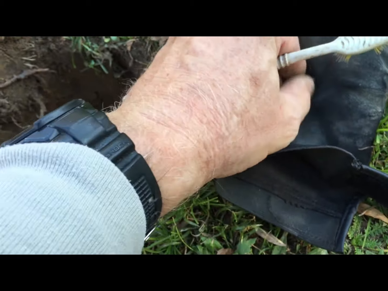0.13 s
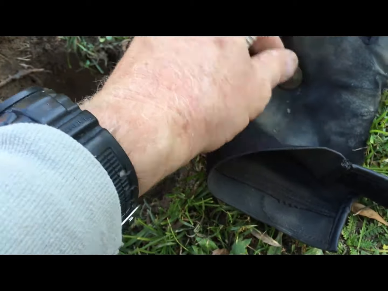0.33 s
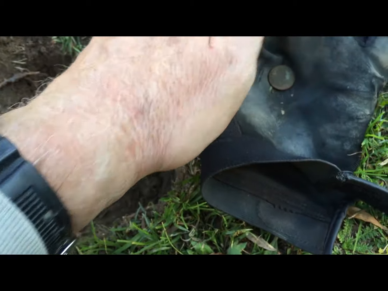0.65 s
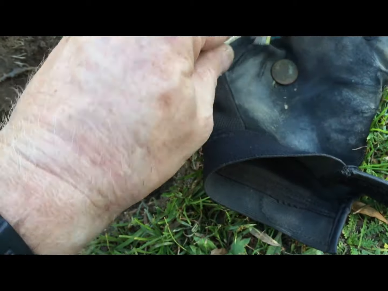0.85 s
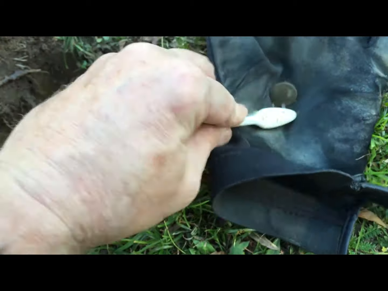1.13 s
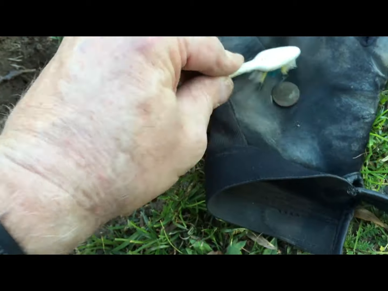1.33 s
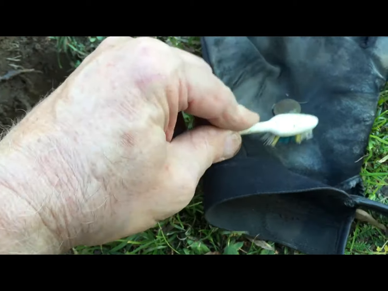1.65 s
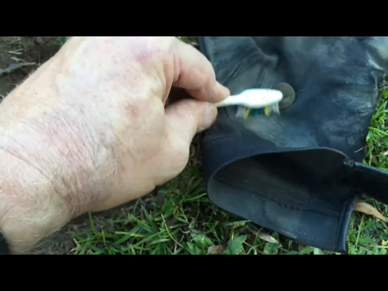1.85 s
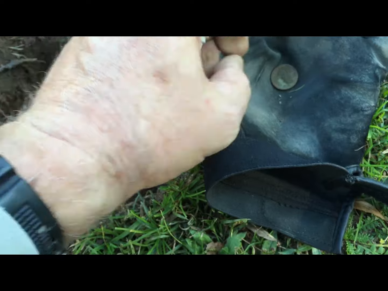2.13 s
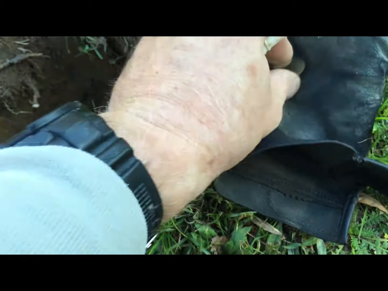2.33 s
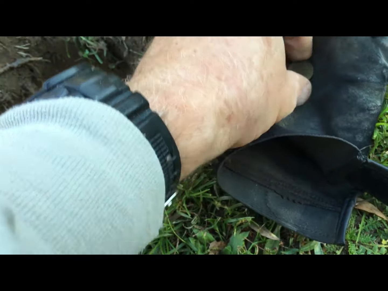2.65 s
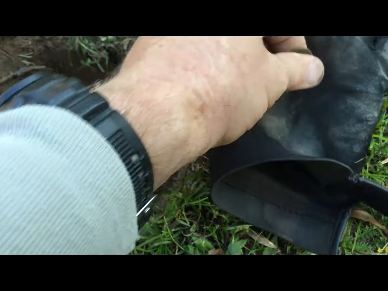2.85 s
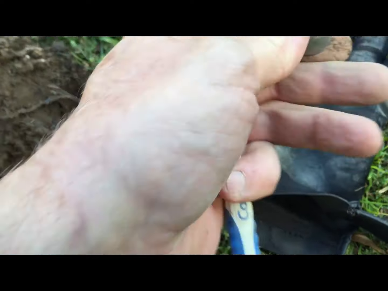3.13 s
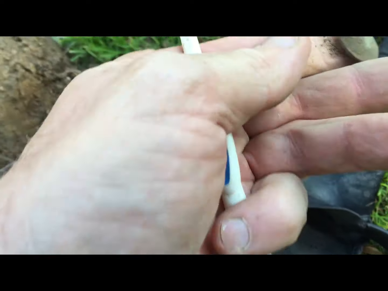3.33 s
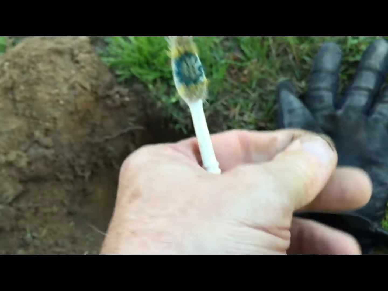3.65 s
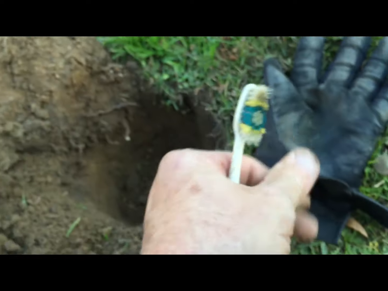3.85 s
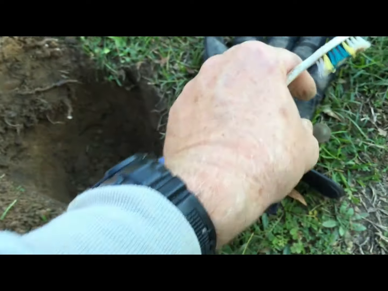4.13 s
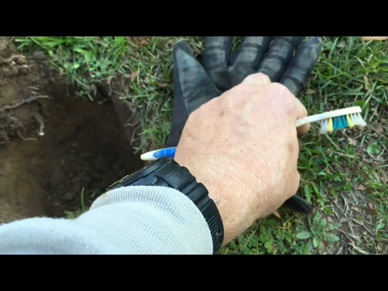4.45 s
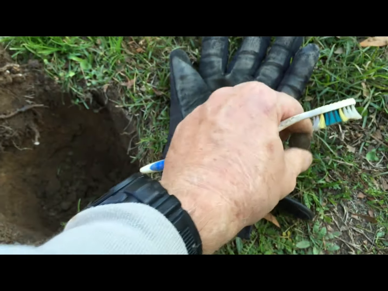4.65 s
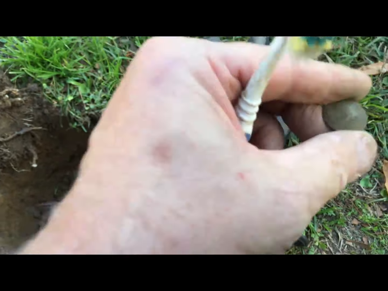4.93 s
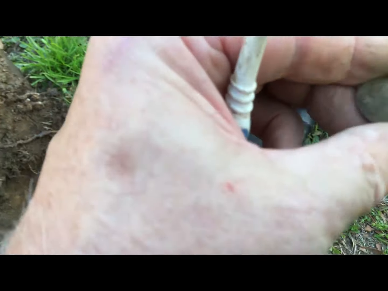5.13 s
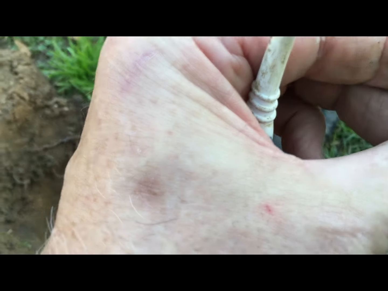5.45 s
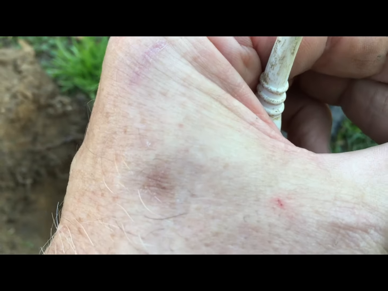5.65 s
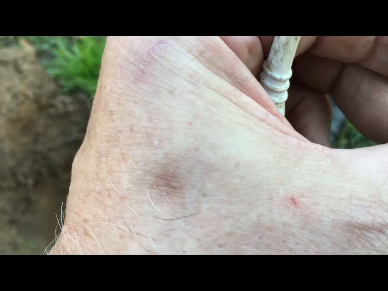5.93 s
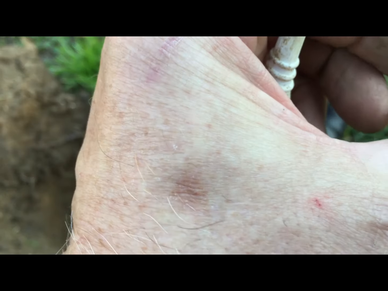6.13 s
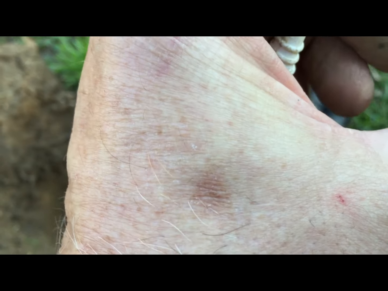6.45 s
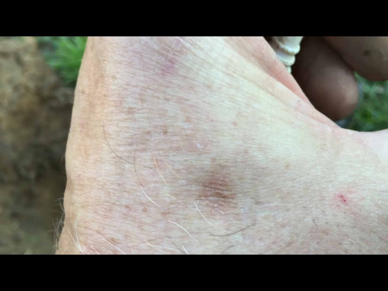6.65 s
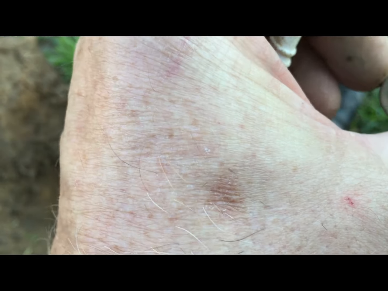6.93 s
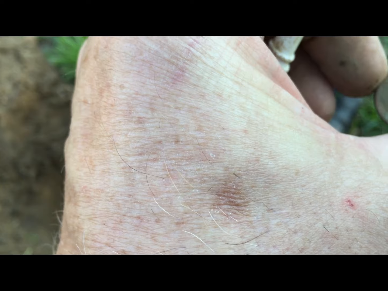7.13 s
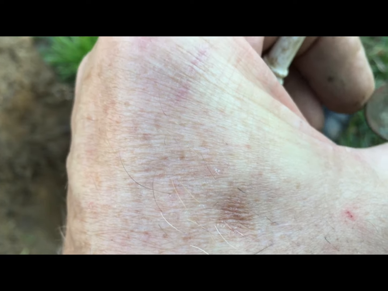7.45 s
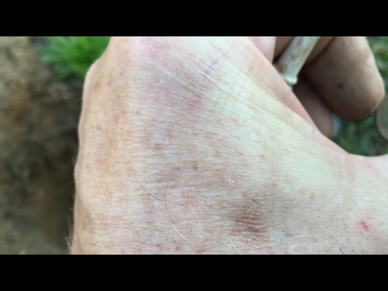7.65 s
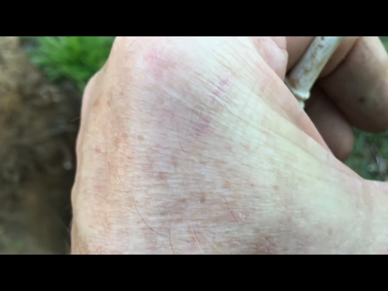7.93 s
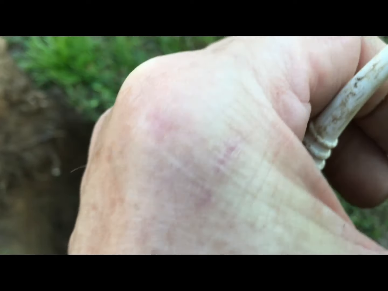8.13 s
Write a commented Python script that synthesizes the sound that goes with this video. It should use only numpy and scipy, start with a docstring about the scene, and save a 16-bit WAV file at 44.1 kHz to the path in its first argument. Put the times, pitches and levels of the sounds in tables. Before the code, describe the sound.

A distant engine rises and drops in pitch as it shifts gears, over a steady low road rumble. Close up, a coin bumps softly on leather and toothbrush bristles scratch dirt off it with tiny crackles. Fingers pick the coin up with a click, and cloth swishes past the microphone. In the second half the handling stops, leaving the fading engine, a soft traffic wash and faint birds in the open air.

```python
"""Scrubbing a dug-up coin outdoors

A coin is laid on a leather glove in the grass, scrubbed with a toothbrush and picked up again.
Bristles and fingers stick and slip, grit snaps loose, the coin bumps and a sleeve swishes close by.
Far off, a V8 engine speeds up through two gear changes, its pitch set by how fast it fires.
It fades into the wash of traffic while a few birds chirp."""
import sys
import numpy as np
from scipy import signal
from scipy.fft import rfft, irfft, next_fast_len
from scipy.io import wavfile
from scipy.ndimage import uniform_filter1d, map_coordinates

SR = 44100
rng = np.random.default_rng(int(sys.argv[2]) if len(sys.argv) > 2 else 0)


def unload_wav(signal):
    """Save mono or channel-first audio to the path in sys.argv[1] as 16-bit WAV at rate SR, clipped to [-1, 1]."""
    wavfile.write(
        sys.argv[1],
        SR,
        np.round(np.clip(np.atleast_2d(signal).T, -1, 1) * 32767).astype(np.int16),
    )


N = 365789
TIME = np.arange(N) / SR
CUTOFF_HZ, THUD_BELOW_HZ = 12000, 1000
EDGE_DB, SWELL_ROUNDNESS = 28.5, 1.55  # a rise or fall time below covers a change of EDGE_DB

# Strokes of the brush, and of fingers sliding the coin over leather. Each row: time of top speed,
# rise and fall in seconds, relative level in dB, extra treble in dB.
BRUSH_STROKES = [(1.21, 0.041, 0.03, -50, -1), (1.255, 0.036, 0.023, -56.5, 5),
                 (1.335, 0.13, 0.077, -49, 5), (1.4, 0.069, 0.068, -54, 4), (1.64, 0.077, 0.059, -49.5, 2),
                 (1.69, 0.048, 0.065, -74.5, 15), (1.75, 0.063, 0.048, -49.5, -3.5),
                 (1.797, 0.015, 0.042, -56.5, -12), (1.897, 0.045, 0.026, -56.5, -13),
                 (1.948, 0.088, 0.066, -53, 4), (2.065, 0.096, 0.12, -50, 5.5)]
FINGER_STROKES = [(0.13, 0.39, 0.49, -69.5, -2), (0.3, 0.034, 0.066, -67.5, -2),
                  (0.368, 0.031, 0.025, -56.5, -6.5), (0.485, 0.054, 0.061, -62, -2),
                  (0.563, 0.11, 0.11, -57.5, -7), (0.65, 0.15, 0.24, -67.5, -8),
                  (2.58, 0.14, 0.2, -56, -4.5), (2.655, 0.056, 0.076, -51.5, -8.5),
                  (2.77, 0.075, 0.1, -80, 4), (2.862, 0.065, 0.06, -51.5, -3.5),
                  (2.905, 0.064, 0.038, -54, -7), (3.0, 0.097, 0.1, -62, 0.5)]
# Sleeve and skin brushing past. Each row: time of top speed, rise and fall in seconds,
# relative level in dB, ringing pitch in Hz, its slide in octaves per second.
SLEEVE_STROKES = [(0.94, 0.08, 0.12, -64.5, 6100, 3), (1.04, 0.15, 0.14, -74.5, 7150, -2),
                  (3.177, 0.13, 0.17, -66, 7800, -5), (3.291, 0.02, 0.039, -53, 6530, 3),
                  (3.331, 0.045, 0.095, -58, 7400, 3), (3.821, 0.033, 0.06, -67, 8550, 0),
                  (3.872, 0.05, 0.08, -51.5, 8770, 7.5), (3.942, 0.062, 0.093, -57.5, 7740, -10),
                  (4.075, 0.025, 0.026, -50, 6900, -2)]
# The tone colour of those three. Each row: frequency in Hz, relative strength in dB.
BRUSH_SPECTRUM = [(400, 1), (700, -7.5), (1100, 2), (2000, 3), (2350, -2.5), (2750, -4.5), (3300, -1),
                  (4800, -5), (6200, -3), (7700, -7.5), (9200, -6.5), (10500, -12.5), (11400, -8.5),
                  (12500, -24)]
FINGER_SPECTRUM = [(400, -26), (780, -3.5), (1200, 3), (2050, 2.5), (2400, -2), (2900, -0.5), (3600, -0.5),
                   (4500, -4), (6000, -2), (7800, -7.5), (8800, -4), (10500, -12.5), (11300, -5),
                   (12500, -24)]
SLEEVE_SPECTRUM = [(1200, -40), (2000, -28), (2350, -0.5), (2900, -6), (4200, -3.5), (5100, -4.5),
                   (6400, 2), (9000, 3), (10500, -2), (11400, 1.5), (12500, -18)]
# Skin rasping on handle and coin. Each row: middle and half length in seconds, pitch and
# band width in Hz, level in dB.
GRIP_RASPS = [(0.128, 0.044, 1770, 730, -66), (0.747, 0.036, 7660, 2500, -75.5),
              (2.32, 0.048, 8350, 4900, -74.5), (2.657, 0.011, 3500, 2389, -55.5),
              (2.884, 0.12, 2030, 350, -69), (3.911, 0.033, 2360, 400, -67), (4.364, 0.15, 2120, 1500, -72),
              (4.823, 0.029, 8300, 4900, -79)]
# Soft bumps of the coin on the glove, and sharp clicks of coin and handle in the hand.
# Each row: start in seconds, relative peak in dB, brightness in dB per octave, extra thud in dB.
COIN_BUMPS = [(0.3585, -48.5, 4, 10), (0.369, -47, -10, -16), (0.5906, -39.5, 2.5, 4.5),
              (1.578, -42, -7, -4)]
HAND_CLICKS = [(2.975, -30, 1, -1), (3.2249, -35.5, -3, -13), (4.337, -45, -4, 2), (5.05, -47.5, 10, 26)]
# The coin's notes, muffled by leather. Each row: pitch in Hz, relative level in dB,
# seconds to fade by 60 dB.
COIN_NOTES = [(445, -15.5, 0.03), (720, -11.5, 0.012), (950, -6, 0.016), (1380, -7.5, 0.017),
              (1950, -7, 0.0098), (2460, -8, 0.018), (3270, -4, 0.0058)]
# The notes in a click. Each row: pitch and band width in Hz, relative level in dB.
CLICK_NOTES = [(670, 250, 0.5), (1350, 280, 1), (1970, 590, 0), (3750, 470, -5), (6300, 1200, -28)]
# Dirt snapping loose. Each row: start in seconds, peak in dB, pitch in Hz, seconds to crumble away.
GRIT_SNAPS = [(0.367, -45, 7000, .008), (0.7808, -47.5, 10000, .004), (0.928, -44, 4400, 0.0088),
              (0.932, -37.5, 5600, .004), (1.1906, -43, 5000, .005), (1.198, -40, 3600, 0.0075),
              (1.213, -40, 5530, 0.012), (1.2692, -38, 5000, .005), (1.274, -39, 5000, .005),
              (1.284, -30.5, 5170, 0.0035), (1.294, -32, 4440, .006), (1.3175, -31, 6750, .005),
              (1.32, -33.5, 1930, 0.012), (1.3305, -33, 5500, .006), (1.339, -31.5, 5360, .02),
              (1.3464, -33, 4900, .008), (1.355, -32, 4870, .008), (1.579, -46, 6300, .008),
              (1.5972, -40, 4170, 0.015), (1.6098, -34, 5530, 0.012), (1.622, -42, 5000, .012),
              (1.734, -44, 2300, .008), (1.785, -54, 3500, .005), (1.822, -48, 3800, 0.029),
              (2.112, -37.5, 4000, 0.011), (2.607, -41, 5990, 0.0076), (2.6538, -41, 3770, .006),
              (2.699, -41, 1980, 0.0082), (2.8375, -50, 4260, .006), (2.965, -46, 3600, .006),
              (3.181, -44, 8500, .008), (3.286, -41.5, 5460, .02), (3.879, -38, 4500, .004),
              (3.881, -39, 3160, 0.0035), (4.0746, -44, 8005, 0.0094), (4.337, -58, 10500, .008),
              (6.63, -58.5, 10500, .012)]

# The engine pulls through three gears, then coasts. Each row: time in seconds, firings per second.
FIRING_RATE = [(0.0, 112.6), (0.6, 128.1), (0.95, 145.6), (1.52, 158.5), (1.82, 126.4), (2.5, 129.8),
               (3.13, 143.8), (3.62, 99.34), (5.4, 123), (6.66, 129.3), (7.1, 103), (8.29, 88.9)]
# How loud it arrives. Each row: time in seconds, relative levels of firing tone and burble in dB.
ENGINE_LEVELS = [(0.0, -37.5, -47), (0.6, -41, -39.5), (0.95, -34.5, -39), (1.35, -39, -44),
                 (1.68, -37, -43.5), (2.1, -37, -40.5), (3.25, -38, -40.5), (3.9, -41, -42.5),
                 (4.95, -41, -44), (6.45, -44, -43.5), (6.7, -60, -41), (7.2, -50, -53), (8.29, -74, -70)]
# The driver eases off. Each row: deepest moment, rise and fall in seconds, depth of the dip in dB.
THROTTLE_LIFTS = [(1.56, 0.11, 0.066, 8.5), (4.56, 0.081, 0.19, 5.5), (5.95, 0.8, 0.21, 7.5)]
# Engine echoes off far walls. Each row: delay in seconds, steady level in dB, time the car passes
# the wall and half length of that pass in seconds, level of the echo added then in dB.
WALL_ECHOES = [(.23, -16.5, 1.71, 0.045, 5.5), (.41, -16, 1.976, 0.058, 1.5), (.62, -14, 2.07, .05, 1)]
# The low roar of the exhaust. Each row: frequency in Hz, relative strength in dB.
ROAR_SPECTRUM = [(170, 5), (220, 6), (270, -4), (340, -4.5), (385, -23.5), (430, -14.5), (500, -13.5),
                 (550, -11), (620, -18.5), (800, -32.5)]
# A second, steadier motor. Each row: time in seconds, pitch in Hz.
MOTOR_PITCH = [(0.0, 63.8), (1.8, 67.07), (3.1, 68.47), (3.6, 61.15), (4.4, 60.1)]
# Its swells. Each row: loudest moment, rise and fall in seconds, level in dB.
MOTOR_SWELLS = [(0.08, 0.24, 0.28, -41.5), (0.42, 0.34, 0.27, -38), (1.38, 0.3, 0.45, -33.5),
                (1.98, 0.34, 0.71, -39.5), (2.82, 0.41, 0.76, -36.5)]
# A faint, late hum. Each row: pitch in Hz, relative level in dB.
HUM_TONES = [(165.5, -53.5), (184, -61.5), (198.5, -56)]
# Thin far calls, mostly birds, and tyres singing briefly. Each row: middle and half length
# in seconds, pitch in Hz, relative level in dB.
BIRD_CALLS = [(4.337, 0.14, 1250, -70), (4.599, 0.1, 4500, -85.5), (4.656, 0.12, 5400, -86),
              (4.832, .022, 5930, -80), (5.63, 0.013, 2300, -71), (6.399, 0.023, 2800, -83),
              (6.396, 0.049, 2430, -77), (6.51, .028, 2330, -74.5), (6.639, .025, 1950, -73)]
TYRE_SONGS = [(4.803, 0.17, 1450, -74.5), (8.152, 0.085, 1650, -71.5)]
# Road rumble, deep boom, tyre wash and still air. Each row: frequency in Hz, relative strength in dB.
RUMBLE_SPECTRUM = [(60, 5), (110, -4), (160, -6.5), (185, -0.5), (220, 0), (265, -5), (320, -18),
                   (390, -19), (470, -27), (560, -29), (630, -44.5), (1000, -68)]
BOOM_SPECTRUM = [(22, -24), (32, -17), (40, -12), (48, -0.5), (62, -16.5), (85, -5.5), (130, 2.5),
                 (180, -14.5)]
TYRE_SPECTRUM = [(400, -8.5), (700, -2.5), (1050, 1.5), (1500, 2), (1900, 0), (2400, -6), (3300, -14),
                 (5000, -26), (9000, -57)]
AIR_SPECTRUM = [(500, -10), (3800, 4), (4900, -0.5), (5800, 2), (7600, -2.5), (9200, -0.5), (10500, -6),
                (11400, -3), (12500, -11.5)]


def friction(strokes, spectrum, per_s, spread_db, flutter_db, patchy_db, body_db, treble_db, brightening):
    """Countless tiny slips, bunched by the uneven surface. Brightening above 1 makes speed add treble."""
    slips = grains(per_s, spread_db) * from_db(flutter_db * drift(72))
    slips = patchy(coloured(slips, spectrum), patchy_db)
    body = signal.sosfiltfilt(signal.butter(2, 4500, fs=SR, output="sos"), slips)
    treble = slips - body
    body_gain = treble_gain = 0
    for s, rise_s, fall_s, db, bright_db in strokes:
        speed = swell(s, rise_s, fall_s)
        body_gain += from_db(db + body_db) * speed
        treble_gain += from_db(db + treble_db + bright_db) * speed ** brightening
    return body_gain * rms_one(body) + treble_gain * rms_one(treble)


def sleeve_swishes(hiss_db=-1.5, ring_db=-5.5, ring_width_hz=900):
    """Cloth hisses finely, with a ringing band that slides as the hand moves."""
    hiss = from_db(hiss_db) * coloured(grains(per_s=7200, spread_db=3.0), SLEEVE_SPECTRUM)
    lowpass = signal.butter(2, ring_width_hz / 2, fs=SR, output="sos")
    low_noise = np.sqrt(2) * rms_one(signal.sosfilt(lowpass, rng.standard_normal(N)))
    out = 0
    for s, rise_s, fall_s, db, hz, glide in SLEEVE_STROKES:
        sliding_hz = hz * 2 ** (glide * np.clip(TIME - s, -.1, .1))
        ring = from_db(ring_db) * low_noise * sine(sliding_hz)  # moves the noise up to that pitch
        out += from_db(db) * swell(s, rise_s, fall_s) * (hiss + ring)
    return out


def grip_rasps():
    """Skin slips on the handle and coin in short, soft rasps."""
    slips = grains(per_s=4000, spread_db=4.5)
    return sum(from_db(db) * bell(s, half_s) * band(slips, hz, width_hz)
               for s, half_s, hz, width_hz, db in GRIP_RASPS)


def coin_bumps(level_db=2.5, contact_s=0.00019):
    """A soft blow rings all the coin's notes, and the leather quickly stops them."""
    out, t = np.zeros(N), TIME[:SR // 15]
    for s, peak_db, slope_db, thud_db in COIN_BUMPS:
        ring = 0
        for hz, db, fade_s in COIN_NOTES:
            note_db = db + slope_db * np.log2(hz) + thud_db * (hz < THUD_BELOW_HZ) + rng.normal(0, 1)
            note = from_db(note_db - 60 * t / fade_s) * np.sin(2 * np.pi * hz * t)
            ring = note - ring  # signs alternate
        onset = 1 - np.exp(-t / contact_s)
        add_hit(out, s, ring * onset, peak_db + level_db)
    return out


def hand_clicks():
    """One hard tap rings a few well-separated notes."""
    out, tap = np.zeros(N), signal.unit_impulse(SR // 15)
    for s, peak_db, slope_db, thud_db in HAND_CLICKS:
        ring = 0
        for hz, width_hz, db in CLICK_NOTES:
            note_db = db + slope_db * np.log2(hz) + thud_db * (hz < THUD_BELOW_HZ)
            note = from_db(note_db) * np.sqrt(width_hz) * band(tap, hz, width_hz)
            ring = note - ring  # signs alternate
        add_hit(out, s, ring, peak_db)
    return out


def grit_snaps(crumble_db=-13, band_ratio=1.4):
    """Each grain of dirt breaks free with one dry click and crumbles away."""
    out, t = np.zeros(N), TIME[:SR // 25]
    for s, peak_db, hz, crumble_s in GRIT_SNAPS:
        edges_hz = [hz / band_ratio, min(hz * band_ratio, CUTOFF_HZ)]
        bandpass = signal.butter(2, edges_hz, "band", fs=SR, output="sos")
        crumbs = rng.standard_normal(len(t)) * from_db(crumble_db - 60 * t / crumble_s)
        add_hit(out, s, signal.sosfilt(bandpass, (t == 0) + crumbs), peak_db)
    return out


def near_echoes(x, first_s=.0019, last_s=0.013, echo_db=-21.5, sway=0.034, count=5):
    """Ground, hand and forearm send back quick echoes, whose delays sway as the hand moves."""
    echoes = 0
    for delay_s in np.geomspace(first_s, last_s, count):
        swaying_s = delay_s * (1 + sway * drift(0.405))
        echoes += map_coordinates(x, [(TIME - swaying_s) * SR], order=1)
    return (x + from_db(echo_db) * echoes) / np.sqrt(1 + count * from_db(echo_db) ** 2)


def engine(burble_db=-2.0, weak_db=-23, roar_db=-16.5):
    """Eight firings a cycle make the main tone; uneven exhaust sides add a burble and weaker tones."""
    firing_hz, = in_time(FIRING_RATE)
    cycle_hz = firing_hz / 8
    tone_db, uneven_db = in_time(ENGINE_LEVELS)
    eased_db = sum(db * swell(s, rise_s, fall_s) for s, rise_s, fall_s, db in THROTTLE_LIFTS)
    firing = from_db(tone_db - eased_db) * far_tone(firing_hz, waver_db=1.37, jitter_hz=0.97)
    burble = from_db(uneven_db + burble_db) * far_tone(5 * cycle_hz, waver_db=2.5, jitter_hz=0.85)
    weak = sum(far_tone(k * cycle_hz, waver_db=1.5, jitter_hz=2.553) for k in (3, 7, 10, 14))
    weak *= from_db(tone_db + weak_db)
    roar = patchy(noise(ROAR_SPECTRUM), depth_db=3.5, rate_hz=14, count=5, low_hz=204, high_hz=650)
    roar *= from_db(uniform_filter1d(tone_db, size=SR) + roar_db)
    return firing + burble + weak + roar + wall_echoes(firing)


def wall_echoes(x):
    """Far walls send the sound back late, most strongly as the car passes each one."""
    out = 0
    for delay_s, db, s, half_s, passing_db in WALL_ECHOES:
        gain = from_db(db) + from_db(passing_db) * bell(s, half_s)
        out += gain * np.interp(TIME - delay_s, TIME, x, left=0)
    return out


def second_motor(held_db=-46.5, fade_from_s=3.56, fade_db_per_s=11):
    """Another motor drones deeply, swells a few times and dies away."""
    hz, = in_time(MOTOR_PITCH)
    held = from_db(held_db - fade_db_per_s * np.maximum(TIME - fade_from_s, 0))
    swells = sum(from_db(db) * swell(s, rise_s, fall_s) for s, rise_s, fall_s, db in MOTOR_SWELLS)
    return (held + swells) * far_tone(hz, waver_db=1.5, jitter_hz=0.58)


def motor_hum(level_db=-4.0, start_s=3.9, full_s=6.3):
    """A faint hum of far motors fades in and stays."""
    hum = sum(from_db(db + level_db) * far_tone(hz, waver_db=3.0, jitter_hz=0.42) for hz, db in HUM_TONES)
    return hum * np.interp(TIME, [start_s, full_s], [0, 1])


def birds(halo_db=1.0, halo_share=0.14, jitter_share=.016):
    """Each call is a thin, fluttering whistle in a soft halo of scattered sound."""
    white, out = rng.standard_normal(N), 0
    for s, half_s, hz, db in BIRD_CALLS:
        tone = far_tone(hz, waver_db=-2.5, jitter_hz=jitter_share * hz)
        whistle = rms_one(tone * (1 + drift(42)))
        halo = from_db(halo_db) * band(white, hz, halo_share * hz)
        out += from_db(db) * bell(s, half_s) * (whistle + halo)
    return out


def traffic(rumble_db=-51.5, boom_db=-42.5, ebb_db_per_s=1, tyres_db=-71):
    """Road rumble and tyre wash swell once as something passes, over a deep boom that slowly ebbs."""
    passing = swell(top_s=7.32, rise_s=1.9, fall_s=3.4)
    rumble = patchy(noise(RUMBLE_SPECTRUM), depth_db=3.5, rate_hz=5, count=6, low_hz=155, high_hz=610)
    rumble *= from_db(rumble_db + 4 * passing)
    boom = from_db(boom_db - ebb_db_per_s * TIME) * noise(BOOM_SPECTRUM)
    tyres = patchy(noise(TYRE_SPECTRUM), depth_db=2.0, rate_hz=2.7, count=18, high_hz=2800)
    tyres *= from_db(tyres_db + 1.5 * passing)
    singing = sum(from_db(db) * bell(s, half_s) * band(rng.standard_normal(N), hz, width_hz=450)
                  for s, half_s, hz, db in TYRE_SONGS)
    return rumble + boom + tyres + singing


def still_air(level_db=-78.5):
    """A faint, even hiss lies behind everything."""
    return from_db(level_db) * noise(AIR_SPECTRUM)


def far_tone(hz, waver_db, jitter_hz):
    """A tone shaken in pitch and level on its way through the air."""
    return np.sqrt(2) * sine(hz + jitter_hz * drift(12.34)) * from_db(waver_db * drift(7.7))


def patchy(x, depth_db, rate_hz=14, count=11, low_hz=700, high_hz=CUTOFF_HZ):
    """Each frequency band swells on its own, as the touching surfaces or the air keep changing."""
    size = next_fast_len(N)
    spectrum, hz = rfft(x, size), np.arange(size // 2 + 1) * SR / size
    centres = np.geomspace(low_hz, high_hz, count)
    bands = (irfft(spectrum * np.interp(hz, centres, share), size)[:N] for share in np.eye(count))
    return sum(part * from_db(depth_db * drift(rate_hz)) for part in bands)


def grains(per_s, spread_db):
    """Tiny random clicks of uneven size."""
    sizes = from_db(spread_db * np.minimum(rng.exponential(1, N), 4.5))
    return rms_one(sizes * rng.choice([-1, 1], N) * (rng.random(N) < per_s / SR))


def noise(spectrum):
    """Smooth noise with a given tone colour."""
    return coloured(rng.standard_normal(N), spectrum)


def coloured(x, spectrum):
    """Give x a tone colour that falls away past the ends of the table, at power one."""
    hz, db = np.transpose(spectrum)
    size = next_fast_len(N)
    log_hz = np.log(np.maximum(np.arange(size // 2 + 1) * SR / size, 1))
    beyond = np.maximum(np.log(hz[0]) - log_hz, 0) + np.maximum(log_hz - np.log(hz[-1]), 0)
    gain = from_db(np.interp(log_hz, np.log(hz), db) - 35 * beyond)
    return rms_one(irfft(rfft(x, size) * gain, size)[:N])


def band(x, hz, width_hz):
    """The part of x around one pitch, at power one."""
    bandpass = signal.butter(2, [hz - width_hz / 2, hz + width_hz / 2], "band", fs=SR, output="sos")
    return rms_one(signal.sosfilt(bandpass, x))


def drift(rate_hz):
    """A smooth random wander, about one in size, drawn at every 20th sample."""
    pole = np.exp(-2 * np.pi * rate_hz * 20 / SR)
    white = rng.standard_normal(N // 20 + 4002)
    slow = signal.lfilter([1], [1, -2 * pole, pole * pole], white)[4000:]  # skip the settling time
    return np.interp(np.arange(N) / 20, np.arange(len(slow)), rms_one(slow))


def swell(top_s, rise_s, fall_s):
    """A rounded rise to one and a fall back to nothing."""
    away = np.maximum((top_s - TIME) / rise_s, (TIME - top_s) / fall_s)
    near, out = away < 3, np.zeros(N)
    out[near] = from_db(-EDGE_DB * away[near] ** SWELL_ROUNDNESS)
    return out


def bell(middle_s, half_s):
    """A bell-shaped rise to one and a matching fall."""
    return np.exp(-.5 * np.minimum(((TIME - middle_s) / half_s) ** 2, 200))


def sine(hz):
    """A pure tone that follows a changing pitch."""
    return np.sin(2 * np.pi * np.cumsum(hz) / SR)


def add_hit(out, s, sound, peak_db):
    """Mix in a short sound at s seconds, peaking at peak_db."""
    at = round(s * SR)
    out[at:at + len(sound)] += from_db(peak_db) * sound[:N - at] / np.abs(sound).max()


def in_time(rows):
    """Join timed rows with straight lines, giving one curve per value column."""
    s, *columns = np.transpose(rows)
    return [np.interp(TIME, s, column) for column in columns]


def from_db(db):
    """Turn decibels into a multiplier."""
    return 10 ** (np.asarray(db) / 20)


def rms_one(x):
    """Scale x to an average power of one."""
    return x / np.sqrt(np.mean(x ** 2) + 1e-20)


def scene():
    """Close handwork over far traffic, in one channel."""
    brush = friction(BRUSH_STROKES, BRUSH_SPECTRUM, per_s=7500, spread_db=2.0, flutter_db=0.66,
                     patchy_db=2.1, body_db=0.64, treble_db=-4.0, brightening=1.18)
    fingers = friction(FINGER_STROKES, FINGER_SPECTRUM, per_s=6000, spread_db=1.0, flutter_db=1.0,
                       patchy_db=3.5, body_db=-0.55, treble_db=-2.5, brightening=1.0)
    rubbing = near_echoes(brush + fingers + sleeve_swishes() + grip_rasps())
    hits = coin_bumps() + hand_clicks() + grit_snaps()
    background = engine() + second_motor() + motor_hum() + birds() + traffic() + still_air()
    return (rubbing + hits + background)[None]


def record(dry):
    """Cut the highest treble steeply."""
    return signal.sosfilt(signal.ellip(12, .1, 80, CUTOFF_HZ, fs=SR, output="sos"), dry)


dry = scene()
out = record(dry)
unload_wav(out)
```